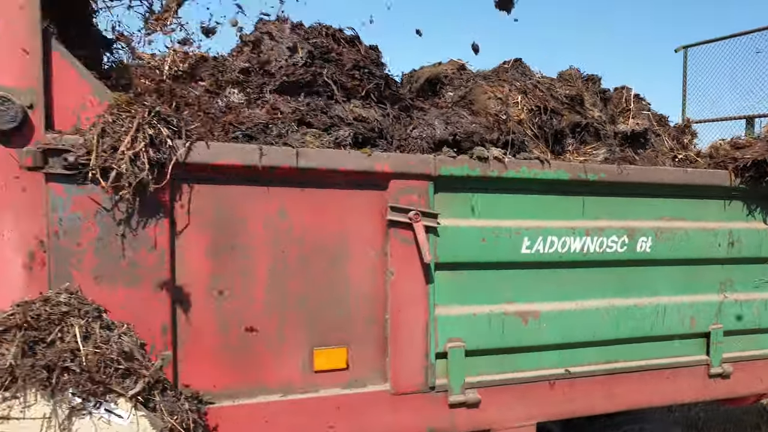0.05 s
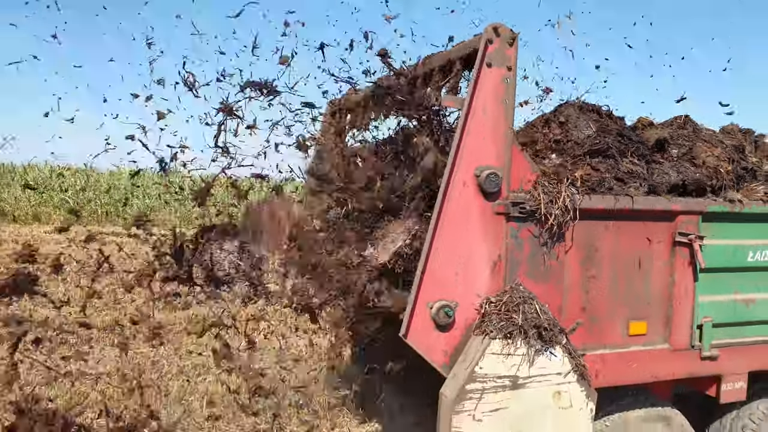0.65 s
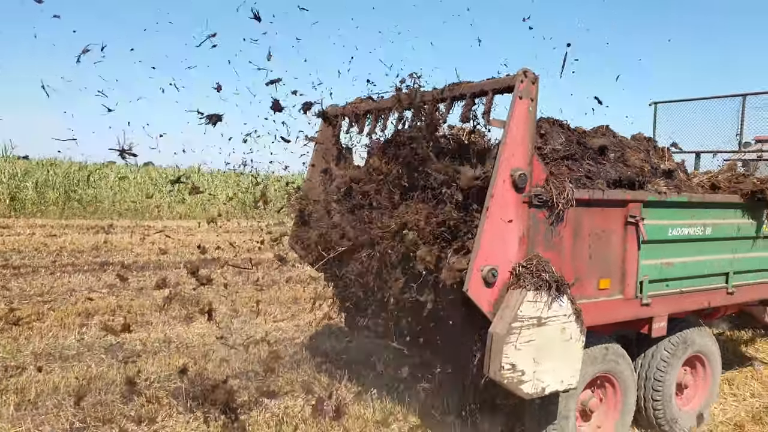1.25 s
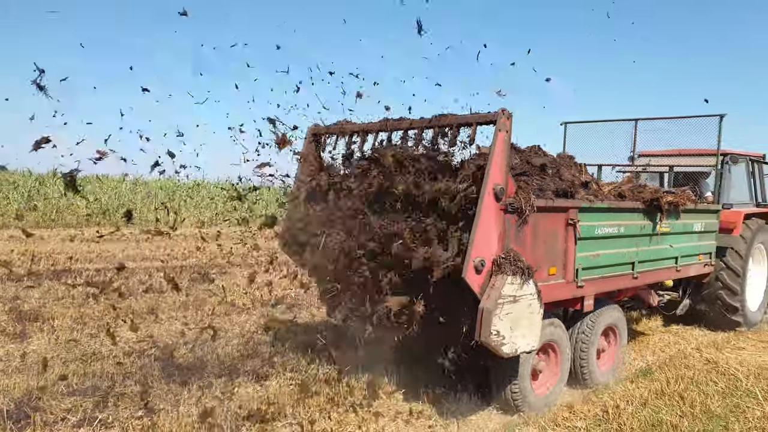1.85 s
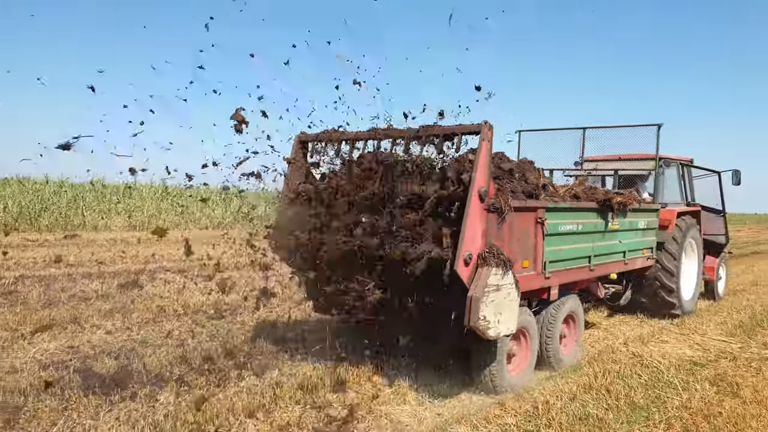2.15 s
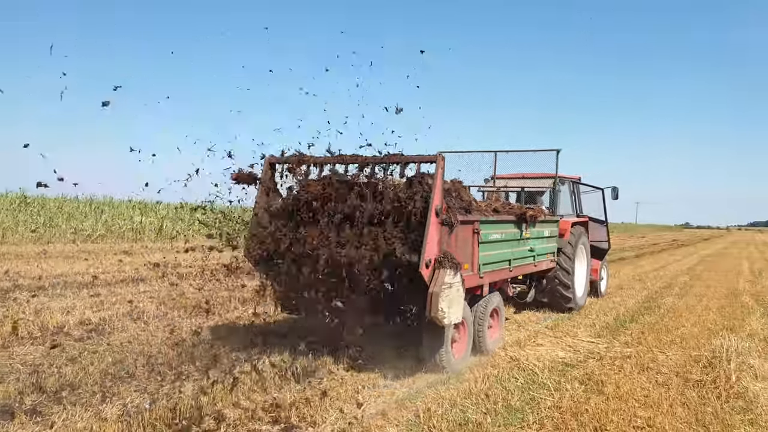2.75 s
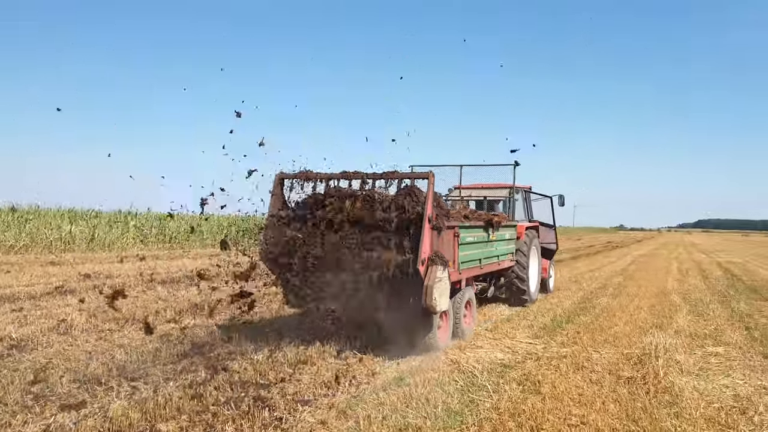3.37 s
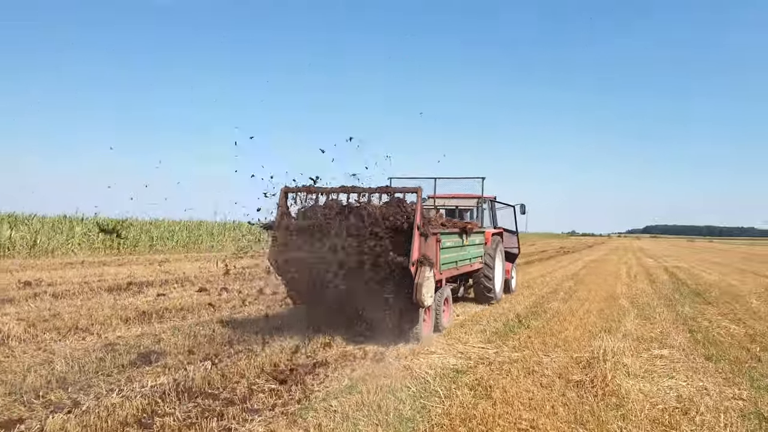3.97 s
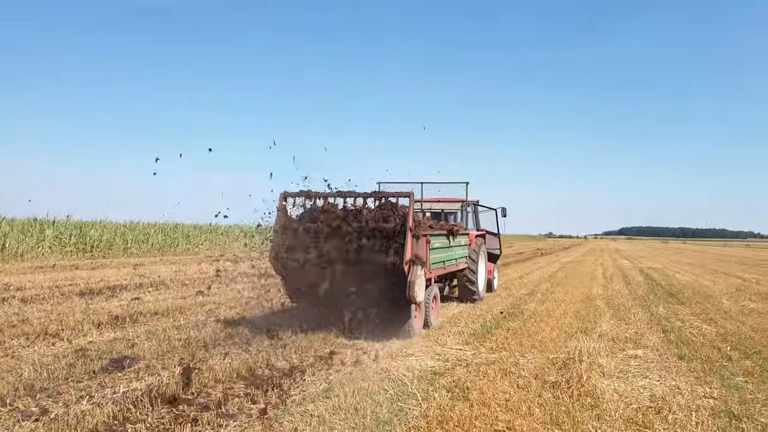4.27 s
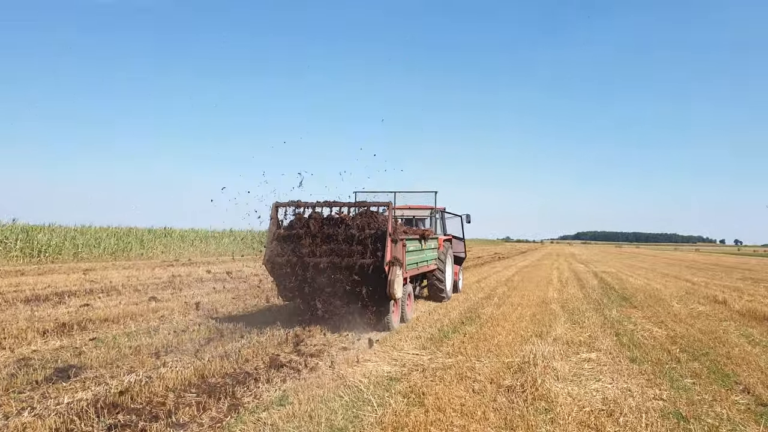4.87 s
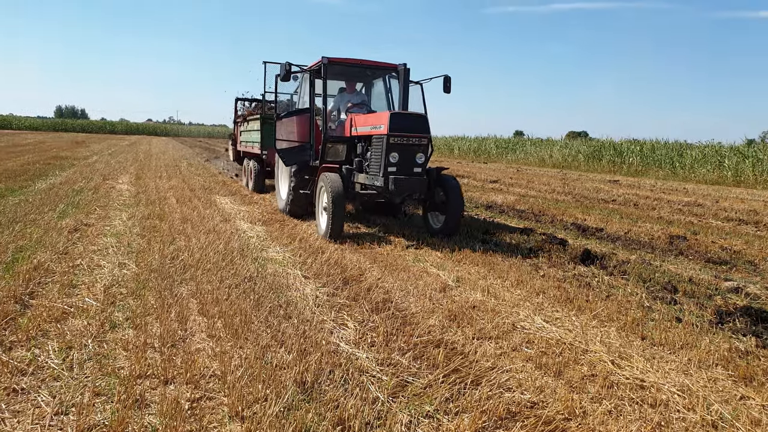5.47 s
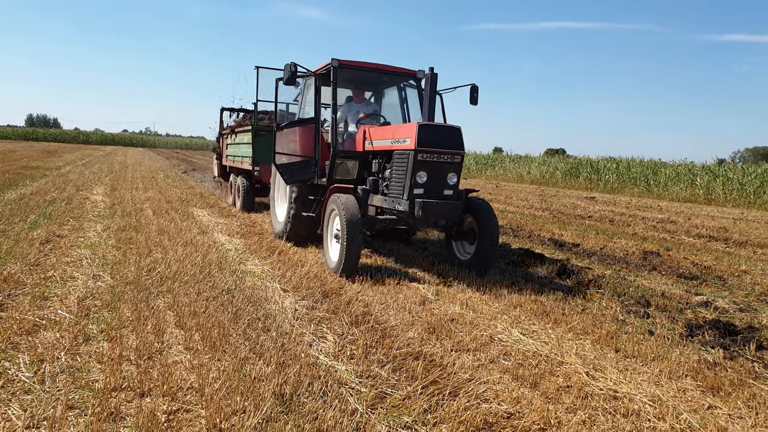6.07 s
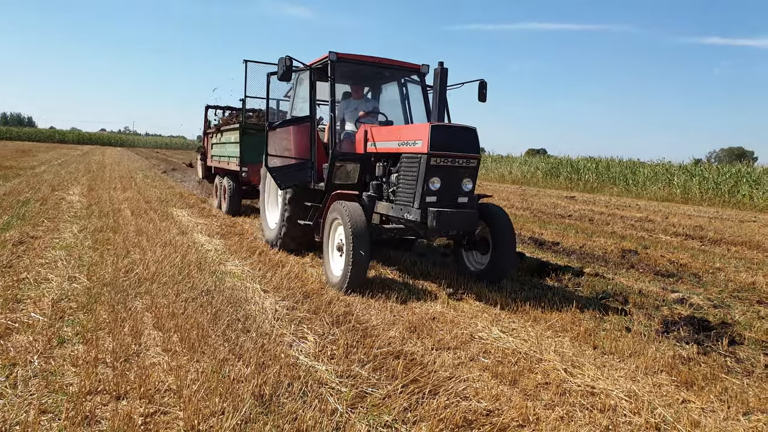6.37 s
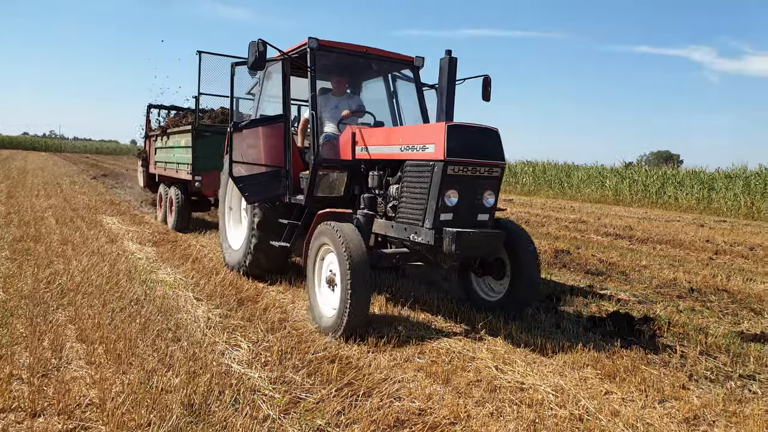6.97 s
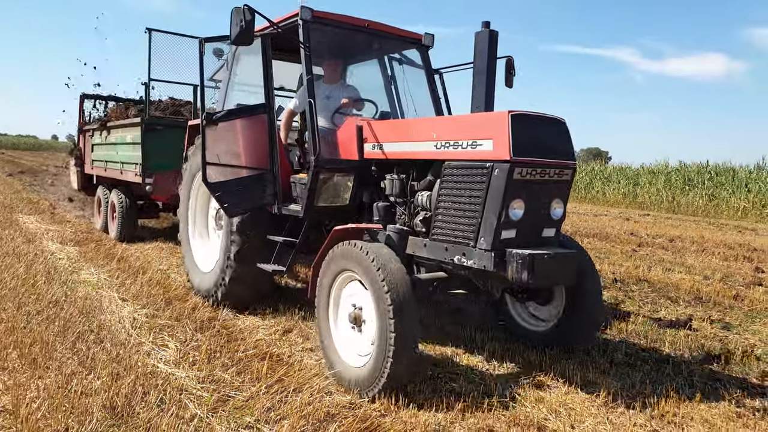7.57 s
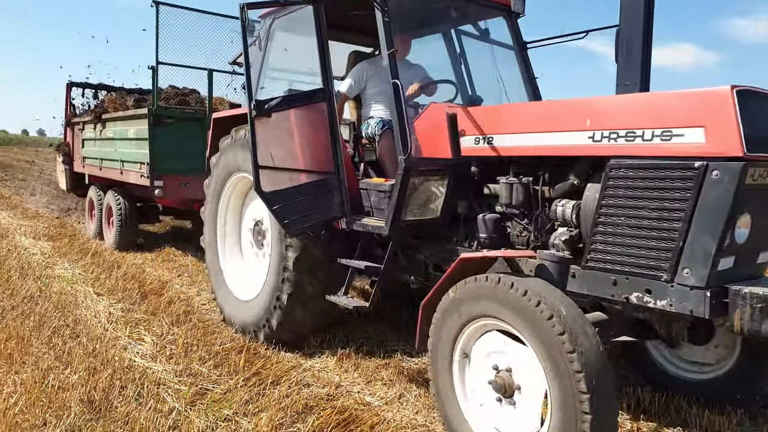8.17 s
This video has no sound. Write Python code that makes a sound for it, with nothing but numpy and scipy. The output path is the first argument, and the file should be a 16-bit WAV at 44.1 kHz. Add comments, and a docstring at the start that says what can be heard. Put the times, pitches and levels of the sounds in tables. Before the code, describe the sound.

A manure spreader thumps, clicks and rattles behind a droning tractor and recedes, then the tractor's chugging diesel engine approaches, growing louder.

```python
"""A four-cylinder diesel tractor pulls a manure spreader over a stubble field.
From behind, its exhaust drones while the beaters pound the load, the feed ratchet clicks,
the steel box clatters and straw rains down as the rig draws away. Then a hard cut to the front:
the engine comes closer and closer, each firing a throb of exhaust, a knock in the block
and a clatter of valves and pump. Bits of straw and grit land close by throughout."""
import sys
import numpy as np
from scipy import signal
from scipy.fft import rfft, irfft, next_fast_len
from scipy.io import wavfile

SR = 44100
rng = np.random.default_rng(int(sys.argv[2]) if len(sys.argv) > 2 else 0)


def waveform_to_disk(signal):
    """Save audio, clipped to [-1, 1], as 16-bit WAV at the path in sys.argv[1]."""
    frames = np.transpose(np.atleast_2d(signal))
    scaled = np.clip(frames, -1, 1) * 32767
    samples = np.round(scaled).astype(np.int16)
    wavfile.write(sys.argv[1], SR, samples)


N = 362502
TIME = np.arange(N) / SR
CUT_S = 4.949   # from the rear view to the front view

FRONT_START_M, FRONT_ASIDE_M, FRONT_M_PER_S = 12, 4.8, 2.78   # up the track, to its side, speed
FIRING_RISE, FIRING_SPREAD_DB = 0.16, 2.0   # attack as a share of a firing, random accent
# Oncoming engine layers. Each pair: base level at the cut in dB, dB gained as the distance halves.
THROB_LEVEL, BOOM_LEVEL, KNOCK_LEVEL = (-25.5, 3.8), (-35, 8.2), (-28.5, 3.65)
VALVE_LEVEL, PUMP_LEVEL, HISS_LEVEL = (-37, 3.8), (-51.5, 11.2), (-45.5, 4.3)
# Engine speed in each view. Each row: time in seconds, firings per second.
SPEED_FRONT = [(5, 51.3), (6.6, 51.5), (6.95, 50.5), (7.3, 52.1), (7.6, 51.4), (8.2, 52.2)]
SPEED_REAR = [(0, 47.0), (1.5, 47.8), (2.7, 47.9), (4.2, 48.6)]
# The uneven punch of the cylinders. Each row: cylinder number, accent in dB.
CYLINDERS = [(0, 3.5), (1, -1.5), (2, 1), (3, 1)]
# Exhaust overtones from the front. Each row: time in seconds, second and third harmonic in dB.
EXHAUST_FRONT = [(4.95, -21.5, -31.5), (5.3, -20, -28), (6.9, -19.5, -28.3), (7.35, -20.5, -26),
                 (7.85, -21.5, -42), (8.2, -22, -40)]
# Exhaust drone, at first screened by the trailer. Each row: time in seconds, level in dB.
EXHAUST_REAR = [(0, -25.5), (0.9, -28.5), (1.5, -32), (2.7, -22), (3.6, -23), (4.95, -23)]
# Tones of the engine's hum. Each row: multiple of the four-stroke cycle rate, relative level in dB.
ORDERS_LOPE = [(5, -31), (6, -29.5), (7, -13.5), (11, -24.5)]
ORDERS_BOOM = [(16, -7), (17, -8.5), (19, -12), (20, -8), (21, -15.5), (23, -14), (25, -10), (27, -11.5),
               (35, -11.5), (41, -11), (48, -10), (61, -12)]
ORDERS_REAR = [(7, -13), (10, -16), (12, -16.5), (14, -18), (23, -22), (45, -45.5), (68, -29)]
# EQ for the engine's boom and hiss. Each row: frequency in Hz, gain in dB.
BOOM_EQ = [(30, -23), (70, -0.5), (130, 5.5), (210, -6), (330, 1), (410, -6), (600, -6), (1000, -8.5),
           (2500, -15.5), (6000, -53)]
HISS_EQ = [(1000, 8.5), (4500, -5.5), (5400, -0.5), (6300, 3), (8000, 1.5), (9500, 1), (12500, 0),
           (16000, -3)]
# Resonances of block, valves and pump. Each row: pitch in Hz, bandwidth in Hz, gain in dB.
BLOCK_MODES = [(516, 113, -1), (643, 183, 3), (782, 128, 0.5), (1003, 123, 1), (1169, 112, 4.5),
               (1315, 123, 0), (1728, 215, 0), (1904, 220, -5)]
VALVE_MODES = [(2310, 90, 1), (2720, 230, 2), (3236, 570, 2), (3800, 340, -0.5), (4390, 800, -3)]
PUMP_MODES = [(2353, 150, 6), (2660, 90, -5)]
# Faint narrow rings flickering in the treble. Each row: pitch in Hz, bandwidth in Hz, gain in dB.
TREBLE_FLICKER_MODES = [(3830, 110, 6), (4430, 90, 1), (6070, 150, -3), (6700, 200, -2.5),
                        (7330, 140, -4.5), (7950, 240, -4)]

REAR_M_PER_S = 1.88
# Trailer parts rolling by. Each pair: closest moment in seconds, distance to the side in metres.
BEATERS_PASS, RATCHET_PASS, BOX_PASS, STRAW_PASS = (0.27, 2.5), (0.033, 0.48), (0.33, 2.95), (0.14, 3.9)
# Spreader layers. Each pair: base level when closest in dB, dB lost as the distance doubles.
POUND_LEVEL, RATTLE_LEVEL, STRAW_LEVEL = (-25, 6.65), (-32.5, 2.57), (-43, 6.86)
PAWL_LEVEL, LINKAGE_LEVEL, SNAP_LEVEL = (-19.5, 4.2), (-29, 2.74), (-9.5, 6.5)
JOLT_LEVEL, CRUNCH_LEVEL = (-17.5, 6.8), (-17.5, 9.2)
# Turns of the crank that feeds the load to the beaters.
# Each row: start in seconds, then accents in dB for ratchet, jolts and wheel ring.
FEED_TURNS = [(0.0995, -1.5, -1.5, -6), (1.2803, 1, -3.5, 0.5), (2.4428, 1, -0.5, -3),
              (3.6013, -0.5, -2, -3), (4.7498, 0.5, 3, -4)]
# Three clicks on the push, three on the return.
# Each row: share of the turn, then accents in dB for pawl, linkage and wheel ring.
PAWL_CLICKS = [(0, -0.5, 0, -5), (0.0365, -0.5, -4.5, -9), (0.069, -1, 0, -6), (0.644, 1, -1, 2),
               (0.692, 1, -2, 4), (0.766, 0.5, 0, -1)]
# Jolts of the steel box. Each row: share of the turn, then accents in dB for panels, frame and floor.
BOX_JOLTS = [(0.036, -7.5, -7, -5.5), (0.097, -23, -13, -1), (0.513, -2, -12, -34), (0.547, 0, -5.5, -0.5),
             (0.578, 4, -7.5, -2.5), (0.826, 1.5, -10.5, 0.5), (0.847, 1.5, -10.5, -0.5)]
# Slabs of the load breaking. Each row: share of the turn, accent in dB.
SLAB_BREAKS = [(0.572, -6.5), (0.824, -3.5)]
# Resonances of ratchet, box and load. Each row: pitch in Hz, bandwidth in Hz, gain in dB.
PAWL_MODES = [(6760, 170, 0.5), (7340, 210, -5), (8440, 200, -6), (8860, 94, -0.5)]
LINKAGE_MODES = [(1626, 140, 5), (2170, 130, 3), (2880, 230, 0), (3550, 89, -1), (3900, 106, -2),
                 (4230, 110, -2), (4850, 810, -7.5)]
SNAP_MODES = [(3930, 2600, -4), (9240, 600, 4.5), (12600, 7800, -1)]
BOX_MODES = [(540.4, 36, -0.5), (688, 61, 2), (820.5, 28.4, 4.5), (932, 69, -2), (1078, 123, -5.5),
             (1505, 165, -8.5), (1742, 112, -7.5), (2255, 220, -14), (2915, 150, -15), (3730, 360, -22),
             (5100, 310, -24)]
PANEL_MODES = [(630, 43, 1), (827, 44, 2), (1070, 200, -12.5)]
FRAME_MODES = [(1650, 124, 1), (1800, 49, 1.5), (2190, 320, -7.5), (3150, 130, -7.5), (3770, 1100, -17.5)]
FLOOR_MODES = [(168, 7.8, 0), (272, 40, 0)]
CRUNCH_MODES = [(420, 200, -4), (1480, 630, -0.5), (2060, 310, -1)]
# EQ for the beaters, the straw and its dulling far off. Each row: frequency in Hz, gain in dB.
POUND_EQ = [(30, -14), (70, -2.5), (130, 0.5), (210, 1), (280, -1), (340, -3), (450, -9), (700, -17),
            (1500, -43), (4000, -78)]
STRAW_EQ = [(300, 8), (1000, 12), (2500, -0.5), (4500, -2.5), (6000, -4.5), (8000, -3), (10000, -1.5),
            (12500, 1.5), (16000, -4)]
AIR_LOSS_EQ = [(3000, -1.5), (8000, -0.5), (15000, -3.5)]
# Hits on loose steel parts, plus one extra ring of the ratchet wheel at 1.759 s. Each row: start in seconds,
# pitch in Hz, peak level in dB.
CLINKS = [(0.778, 3240, -24), (1.102, 315, -22.5), (1.105, 632, -21), (1.105, 1740, -30),
          (1.285, 1720, -26), (1.359, 1790, -31), (1.759, 3930, -31.5), (2.488, 682, -21),
          (4.59, 174, -16.5), (4.831, 5160, -33)]
CLINK_CYCLES, CLINK_LONGEST_S = 150, 0.16   # vibrations in a tail; the load damps the low ones
# Straw and grit landing close by. Each row: start in seconds, strength in dB.
GRIT_HITS = [(1.033, -31), (2.8455, -32.5), (3.7044, -34), (3.9389, -36), (4.4416, -33.5), (4.53, -31.5),
             (5.0419, -35), (5.451, -32), (7.6964, -33)]

# Stereo width in each view. Each row: frequency in Hz, side against mid in dB.
WIDTH_FRONT = [(50, -2), (200, -15), (700, -17.5), (1200, -9), (1600, -4.5), (3000, -7), (4500, -1),
               (5400, 3), (6400, -3), (7500, 0), (15000, 1.5)]
WIDTH_REAR = [(60, 6.5), (100, -26), (300, -14.5), (700, -11), (1300, -3.5), (2000, -1.5), (2850, -2.5),
              (3400, 0), (6000, 0), (15000, 0.5)]
# Stereo balance in each view. Each row: frequency in Hz, left against right in dB.
LEAN_FRONT = [(60, 0), (700, -0.5), (1100, 1), (3000, -1), (3900, -2.5), (5400, 1), (7600, -2.5),
              (9000, 1.5), (12000, -3), (15000, -4)]
LEAN_REAR = [(100, 4.5), (300, -2), (1400, 0), (1750, -6.5), (2200, -0.5), (3600, 0.5), (4900, -4),
             (6000, 0.5), (6900, -9.5), (8900, 8), (10500, 7), (12500, -5), (15000, -1)]


def tractor_ahead(cycles):
    """The oncoming diesel: exhaust and hum in the centre, the noisy layers spread around them."""
    throb = exhaust_throb(cycles)
    lope = from_db(-26.5) * hum(cycles, ORDERS_LOPE, waver_db=7.5)
    drone = from_db(oncoming(BOOM_LEVEL) - 1.5) * hum(cycles, ORDERS_BOOM, waver_db=2.5)
    body = engine_boom(cycles) + diesel_knock(cycles)
    top = valve_clatter(cycles) + injection_pump(cycles) + hiss_and_flicker(cycles)
    return throb + lope + drone + stereo(body + top, WIDTH_FRONT, LEAN_FRONT)


def exhaust_throb(cycles):
    """Two crests a firing, skewed by a third harmonic that fades out close up."""
    second_db, third_db = in_time(EXHAUST_FRONT)
    sway = 0.0032 * np.sin(2 * np.pi * cycles)   # unequal cylinders rock the crank once a cycle
    angle = 2 * np.pi * len(CYLINDERS) * (cycles + sway)
    fundamental = from_db(oncoming(THROB_LEVEL)) * np.cos(angle)
    overtones = from_db(second_db) * np.cos(2 * angle) + from_db(third_db) * np.sin(3 * angle)
    return np.sqrt(2) * (fundamental + overtones)


def engine_boom(cycles):
    """Dark noise pulses with the firings and swells close up."""
    puffs = firing_gate(cycles, decay=0.38, floor=1.0, lag=0) * rng.standard_normal((2, N))
    return from_db(oncoming(BOOM_LEVEL)) * rms_one(colour(puffs, BOOM_EQ))


def diesel_knock(cycles):
    """Every firing is a blast that rings the block."""
    punch = from_db(0.77 * drift(50)) * firing_gate(cycles, decay=0.4, floor=1.0, lag=0.42)
    blasts = punch * crank_noise(cycles, fresh=1.05)
    return from_db(oncoming(KNOCK_LEVEL) - 1.56) * rms_one(resonate(blasts, BLOCK_MODES, order=2))


def valve_clatter(cycles):
    """The valves tap brightly, partly at random, partly locked to the crank."""
    gate = firing_gate(cycles, decay=0.23, floor=1.0, lag=0.47)
    taps = gate * (grains(2500, spread_db=1.5) + 0.92 * crank_noise(cycles, fresh=0))
    level_db = oncoming(VALVE_LEVEL) - 2.1 + 0.71 * drift(50)
    return from_db(level_db) * rms_one(resonate(taps, VALVE_MODES, order=2))


def injection_pump(cycles):
    """A hard rattle on each firing that cuts through close up."""
    shake = firing_gate(cycles, decay=0.25, floor=0.24, lag=0.66) * grains(3000, spread_db=-1.0)
    level_db = oncoming(PUMP_LEVEL) + 1.5 * drift(20)
    return from_db(level_db) * rms_one(resonate(shake, PUMP_MODES, order=2))


def hiss_and_flicker(cycles):
    """A gritty hiss pulses with the firings, with faint, narrow rings flickering in the treble."""
    base_db = oncoming(HISS_LEVEL)
    grit = firing_gate(cycles, decay=0.65, floor=1.0, lag=0.3) * grains(5000, spread_db=-3.0)
    hiss = from_db(base_db + 2.4) * rms_one(colour(grit, HISS_EQ))
    flicker = firing_gate(cycles, decay=0.25, floor=0.49, lag=0.63) * grains(250, spread_db=0.5)
    return hiss + from_db(base_db - 5) * rms_one(resonate(flicker, TREBLE_FLICKER_MODES))


def tractor_behind(cycles):
    """The exhaust drones past the trailer; unequal cylinders make it sway once a cycle."""
    drone_db, = in_time(EXHAUST_REAR)
    sway = 0.011 * np.sin(2 * np.pi * cycles)
    drone = from_db(0.75 * drift(14)) * tone(cycles + sway, order=8)   # twice the firing rate
    drone += hum(cycles, ORDERS_REAR, waver_db=3.0)
    firing_note = from_db(-33.5) * tone(cycles, order=4)
    return from_db(drone_db) * drone + firing_note


def crank():
    """The engine's clock: four-stroke cycles turned so far, at a slightly wavering speed."""
    firing_hz = np.where(TIME < CUT_S, *in_time(SPEED_REAR), *in_time(SPEED_FRONT))
    return np.cumsum(firing_hz + 0.1483 * drift(12)) / SR / len(CYLINDERS)


def firing_gate(cycles, decay, floor, lag):
    """One uneven burst a firing over a steady floor; decay and lag are shares of a firing."""
    firings = cycles * len(CYLINDERS) - lag + 1
    count = firings.astype(int)
    accent_db = np.array(CYLINDERS)[count % len(CYLINDERS), 1]
    strength = from_db(accent_db + FIRING_SPREAD_DB * rng.standard_normal(1024)[count])
    age = firings % 1
    attack = np.minimum(age / FIRING_RISE, 1)
    return floor + strength * attack * np.exp(-np.maximum(age - FIRING_RISE, 0) / decay)


def crank_noise(cycles, fresh):
    """Contacts that loop with the crank angle every cycle, plus a share that is new each time."""
    size = 3440
    loops = [np.interp(cycles % 1 * size, np.arange(size), p) for p in rng.standard_normal((2, size))]
    return loops + fresh * rng.standard_normal((2, N))


def hum(cycles, orders, waver_db):
    """Unequal cylinders put tones at multiples of the cycle rate; each wavers in level."""
    return sum(from_db(db + waver_db * drift(7)) * tone(cycles, round(k)) for k, db in orders)


def tone(cycles, order):
    """One engine order as a sine, rms 1."""
    return np.sqrt(2) * np.sin(2 * np.pi * (order * cycles + rng.random()))


def beaters():
    """The beaters pound the load: a dense, dull thumping with a hollow boom."""
    base_db = passing(POUND_LEVEL, BEATERS_PASS, TIME)
    pound_db = base_db + 0.87 + drift(21.9)
    pounding = from_db(pound_db) * rms_one(colour(grains(1200, spread_db=0.8), POUND_EQ))
    boom = resonate(grains(500, spread_db=2.5), [(271.7, 8.9, 4), (331.2, 13.5, -5.5)], order=2)
    return pounding + from_db(base_db - 7.5) * rms_one(boom)


def box_rattle():
    """The steel box rattles, a little harder around each push of the feed."""
    starts = np.array(FEED_TURNS)[:, 0]
    turns = (TIME - starts[0]) / np.mean(np.diff(starts))
    surge_db = 0.5 * np.cos(2 * np.pi * turns)
    level_db = passing(RATTLE_LEVEL, BOX_PASS, TIME) - 1.0 + surge_db + drift(30)
    return from_db(level_db) * rms_one(resonate(grains(2500, spread_db=0.0), BOX_MODES))


def feed_ratchet():
    """The pawl clicks in threes on each stroke and snaps on its way back; linkage and wheel ring."""
    s, turn_db, _, wheel_db, share, click_db, shake_db, ring_db = every_turn(PAWL_CLICKS)
    pawl_db = passing(PAWL_LEVEL, RATCHET_PASS, s) + turn_db + click_db + 7.5
    linkage_db = passing(LINKAGE_LEVEL, RATCHET_PASS, s) + turn_db + shake_db
    snap_db = passing(SNAP_LEVEL, RATCHET_PASS, s) + click_db
    pawl = 0
    for mode in PAWL_MODES:
        scatter_db = rng.normal(0, 3, len(s))   # every click favours different modes
        pawl += resonate(blows(s, pawl_db + scatter_db, t60=0.052, rise_s=0.0013), [mode])
    linkage = resonate(blows(s, linkage_db + 16, t60=0.089, rise_s=0.0012), LINKAGE_MODES)
    ping_db = linkage_db + wheel_db + ring_db
    wheel = sum(struck(at, hz=3900, peak_db=db, t60=0.07) for at, db in zip(s, ping_db))
    back = share > .5
    snap = resonate(blows(s[back], snap_db[back], t60=0.031, rise_s=0.00099), SNAP_MODES)
    return pawl + linkage + wheel + snap


def box_clanks():
    """Each jolt rings the side panels, the frame and the loaded floor."""
    s, _, turn_db, _, _, panel_db, frame_db, floor_db = every_turn(BOX_JOLTS)
    jolt_db = passing(JOLT_LEVEL, BOX_PASS, s) + turn_db
    panels = resonate(blows(s, jolt_db + panel_db + 12.5, t60=0.16, rise_s=0.004), PANEL_MODES)
    frame = resonate(blows(s, jolt_db + frame_db + 16, t60=0.13, rise_s=0.0011), FRAME_MODES)
    floor = resonate(blows(s, jolt_db + floor_db + 20.5, t60=0.17, rise_s=0.0038), FLOOR_MODES)
    return panels + frame + floor


def load_crunch():
    """Slabs of the load crunch as they break into the beaters."""
    s, *_, accent_db = every_turn(SLAB_BREAKS)
    level_db = passing(CRUNCH_LEVEL, BEATERS_PASS, s) + accent_db + 12.5
    return resonate(blows(s, level_db, t60=0.12, rise_s=0.0063), CRUNCH_MODES)


def straw_rain():
    """Flung straw patters on the stubble and dulls with distance."""
    level_db = passing(STRAW_LEVEL, STRAW_PASS, TIME) + 8.0 + 1.22 * drift(40)
    patter = from_db(level_db) * rms_one(colour(grains(7000, spread_db=3.0), STRAW_EQ))
    far = np.minimum(TIME / CUT_S, 1)
    return (1 - far) * patter + far * colour(patter, AIR_LOSS_EQ)


def clinks():
    """Loose steel parts ring when they are hit, and the ratchet wheel rings once more."""
    return sum(struck(s, hz, db, min(CLINK_CYCLES / hz, CLINK_LONGEST_S)) for s, hz, db in CLINKS)


def grit_ticks():
    """Dry bits tick as they land next to the listener."""
    s, strength_db = np.transpose(GRIT_HITS)
    return resonate(blows(s, strength_db + 5.5, t60=0.045, rise_s=.0007), SNAP_MODES)


def oncoming(level):
    """Level in dB of an engine layer as the tractor drives towards the listener."""
    far_db, gain_db = level
    metres = np.hypot(FRONT_ASIDE_M, FRONT_START_M - FRONT_M_PER_S * (TIME - CUT_S))
    return far_db + gain_db * np.log2(np.hypot(FRONT_ASIDE_M, FRONT_START_M) / metres)


def passing(level, part, s):
    """Level in dB at times s of a trailer part that rolls past and away."""
    closest_db, loss_db = level
    abreast_s, aside_m = part
    return closest_db - loss_db * np.log2(np.hypot(1, REAR_M_PER_S * (s - abreast_s) / aside_m))


def every_turn(pattern):
    """Loop a pattern on the feed turns up to the cut: times, the turn's accents, the pattern's columns."""
    lengths = np.diff(np.array(FEED_TURNS)[:, 0])
    turns = zip(FEED_TURNS, [*lengths, lengths[-1]])
    rows = np.array([(start + row[0] * length, *accents, *row)
                     for (start, *accents), length in turns for row in pattern])
    return rows[rows[:, 0] < CUT_S].T


def grains(per_s, spread_db):
    """Two unrelated streams of tiny random impacts; spread_db varies their size."""
    born = rng.random((2, N)) < per_s / SR
    sizes = from_db(spread_db * np.minimum(rng.exponential(1, (2, N)), 4))
    return rms_one(born * sizes * rng.choice([-1, 1], (2, N)))


def blows(times, levels_db, t60, rise_s):
    """Bursts of chattering contact that build up and die away, in two unrelated streams."""
    hits = np.zeros(N)
    hits[(times * SR).astype(int)] = from_db(levels_db)
    tails = signal.lfilter([1], [1, -from_db(-60 / (t60 * SR))], hits + 1e-18)
    lag = np.exp(-1 / (rise_s * SR))
    return signal.lfilter([1 - lag], [1, -lag], tails) * rng.standard_normal((2, N))


def struck(s, hz, peak_db, t60):
    """One struck mode: a dying sine that starts at s."""
    out = np.zeros(N)
    age = TIME[:SR // 4]
    start = int(s * SR)
    out[start:start + len(age)] = from_db(peak_db - 60 * age / t60) * np.sin(2 * np.pi * hz * age)
    return out


def resonate(x, modes, order=1):
    """Parallel resonances with alternating signs; order 2 has steeper flanks."""
    out = 0
    for k, (hz, width, db) in enumerate(modes):
        r = np.exp(-np.pi * width / SR)
        gain = (1 - r * r) / 2
        section = [gain, 0, -gain, 1, -2 * r * np.cos(2 * np.pi * hz / SR), r * r]
        out = out + (-1) ** k * from_db(db) * signal.sosfilt([section] * order, x + 1e-18)
    return out


def colour(x, spectrum):
    """EQ a sound along a curve of (Hz, dB) points."""
    size = next_fast_len(N + 4096)
    hz, db = np.transpose(spectrum)
    grid = np.maximum(np.arange(size // 2 + 1) * SR / size, 1)
    return irfft(rfft(x, size) * from_db(np.interp(np.log(grid), np.log(hz), db)), size)[..., :N]


def stereo(pair, width, lean):
    """Mid and side to left and right, with width and balance set by frequency."""
    left, right = pair[0] + colour(pair[1], width) * [[1], [-1]]
    half = np.array(lean) * [1, .5]
    return np.array([colour(left, half), colour(right, half * [1, -1])])


def drift(rate):
    """A random wander that changes about rate times a second, rms 1."""
    knots = rng.standard_normal(4096)
    return rms_one(np.interp(TIME * rate, np.arange(len(knots)), knots))


def in_time(rows):
    """Each column of an automation curve at every sample."""
    s, *columns = np.transpose(rows)
    return [np.interp(TIME, s, c) for c in columns]


def from_db(db):
    """Decibels to gain."""
    return 10 ** (np.asarray(db) / 20)


def rms_one(x):
    """Scale to unit rms."""
    return x / np.sqrt(np.mean(x ** 2) + 1e-20)


def scene():
    """The rig draws away, then a hard cut to the tractor coming closer."""
    cycles = crank()
    centre = tractor_behind(cycles) + clinks()
    spreader = beaters() + box_rattle() + straw_rain() + feed_ratchet() + box_clanks() + load_crunch()
    behind = centre + stereo(spreader, WIDTH_REAR, LEAN_REAR)
    return np.where(TIME < CUT_S, behind, tractor_ahead(cycles)) + grit_ticks()


def record(dry):
    """The left microphone is a little hotter; a steep low-pass takes off the very top."""
    cutoff_hz = 15850
    low_pass = signal.ellip(14, .1, 90, cutoff_hz, fs=SR, output="sos")
    return signal.sosfilt(low_pass, dry * from_db([[.3], [-.3]]))


dry = scene()
out = record(dry)
waveform_to_disk(out)
```